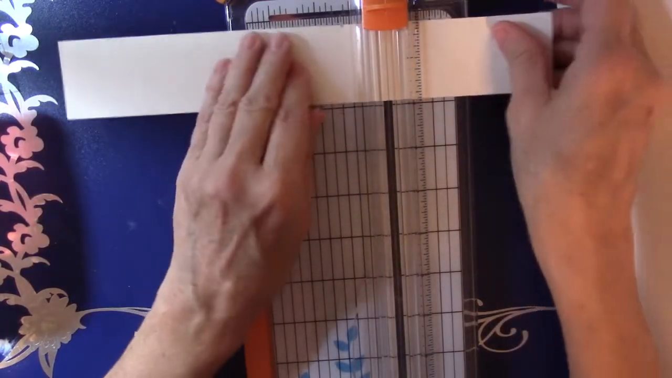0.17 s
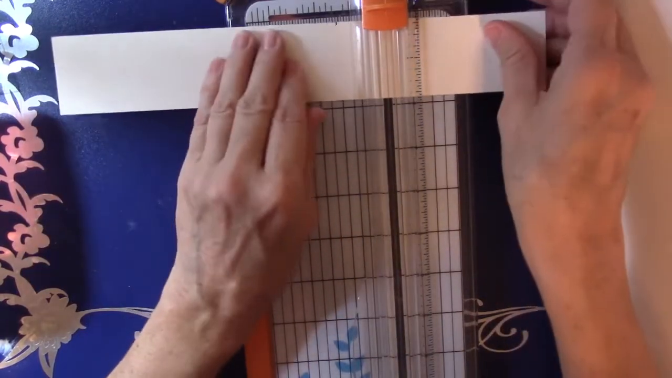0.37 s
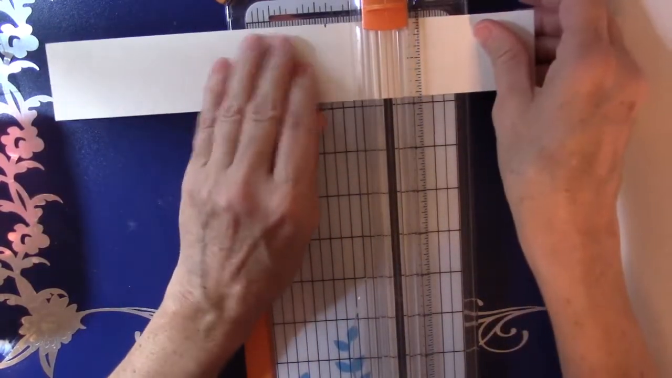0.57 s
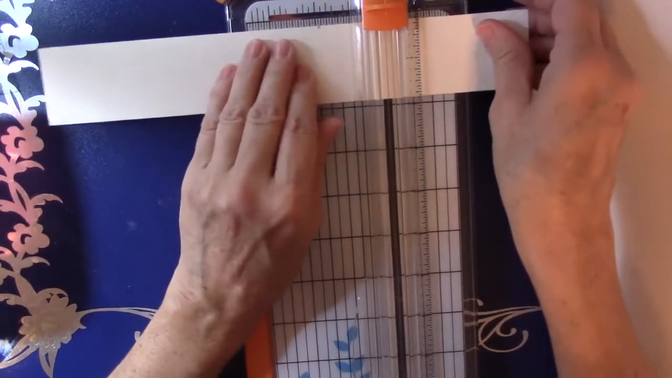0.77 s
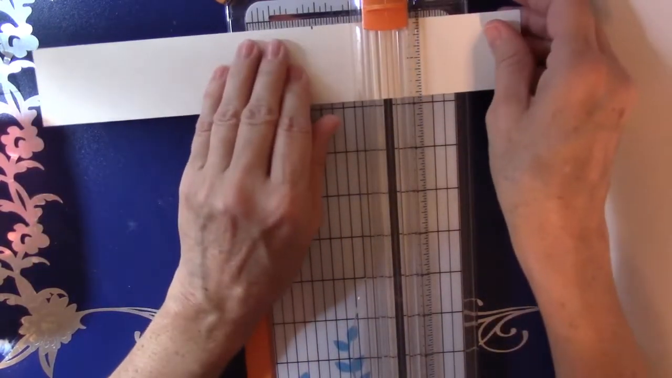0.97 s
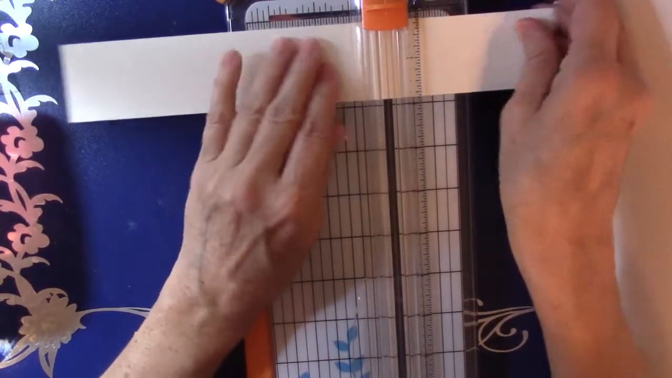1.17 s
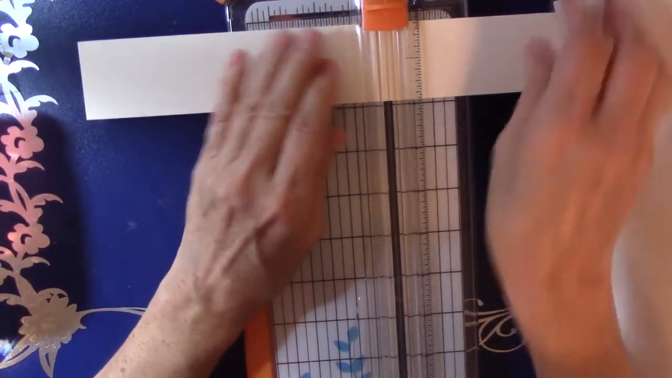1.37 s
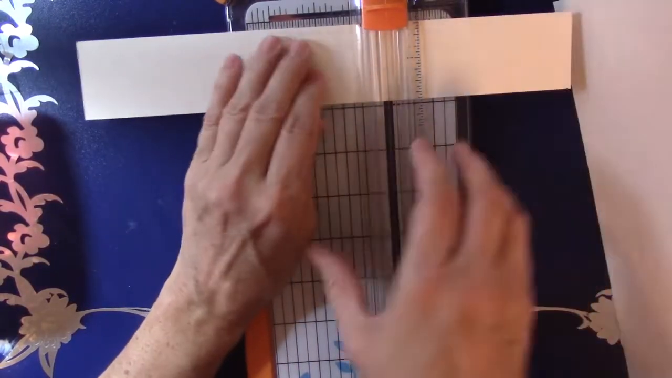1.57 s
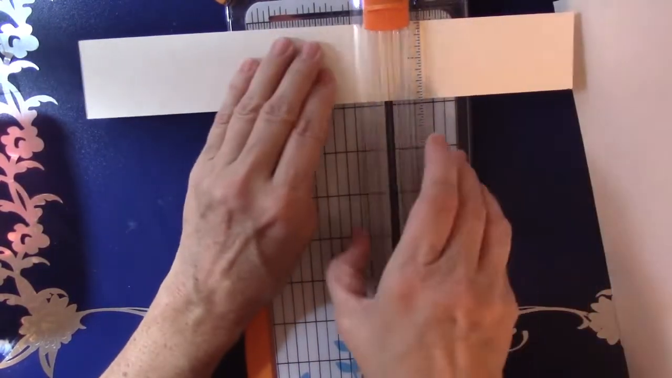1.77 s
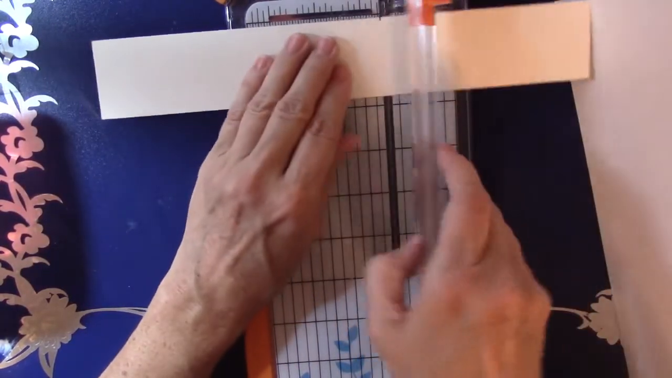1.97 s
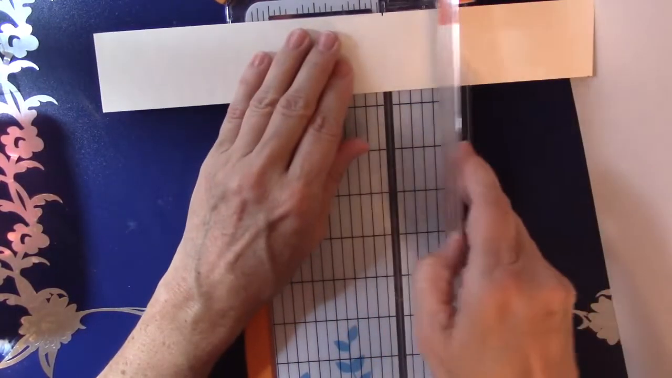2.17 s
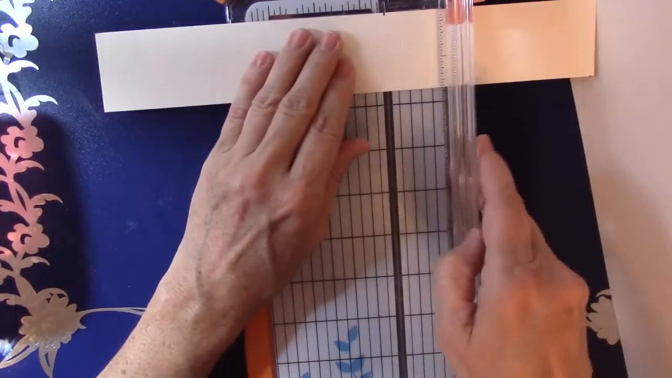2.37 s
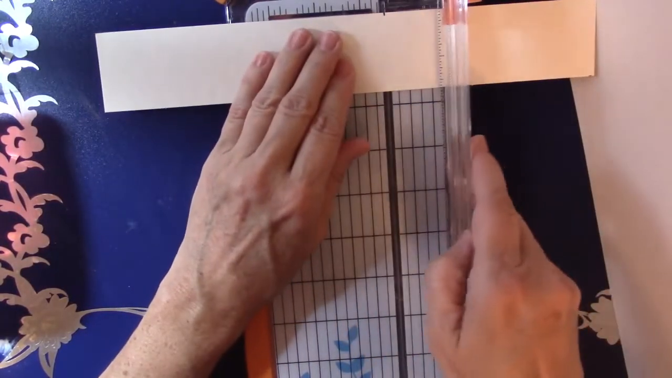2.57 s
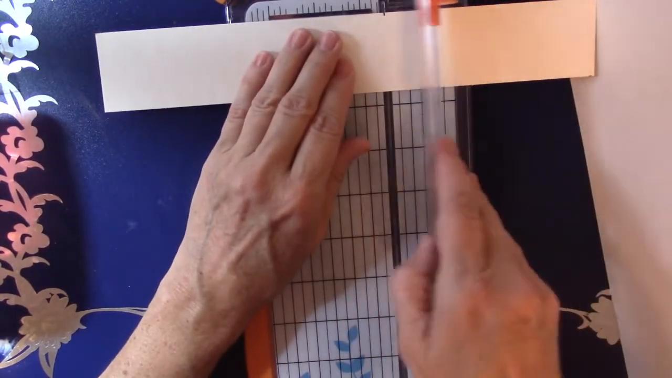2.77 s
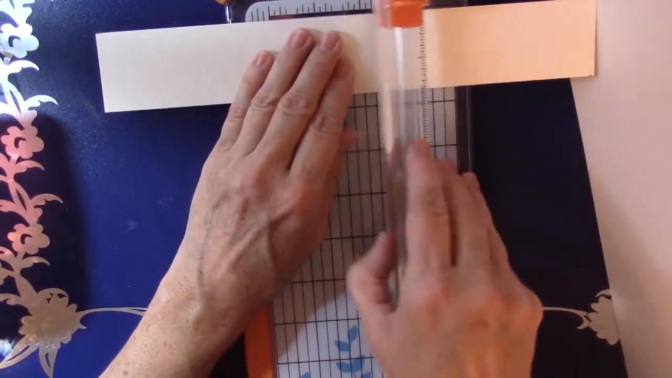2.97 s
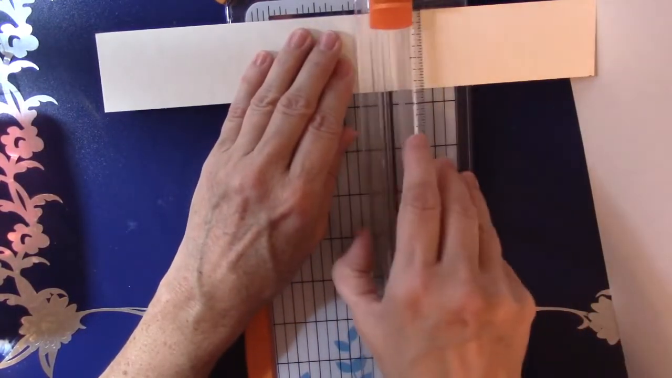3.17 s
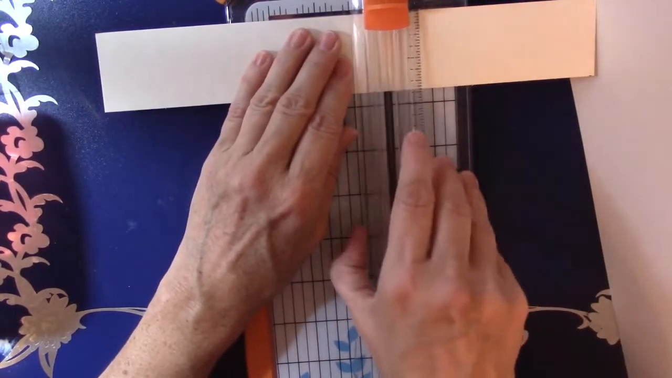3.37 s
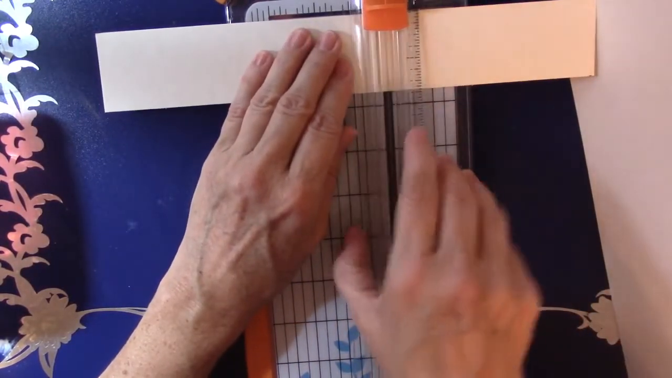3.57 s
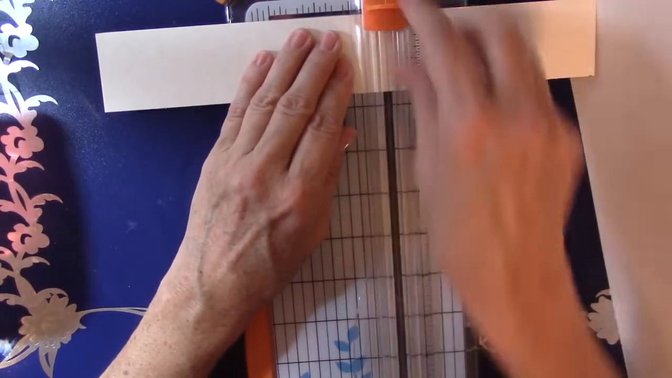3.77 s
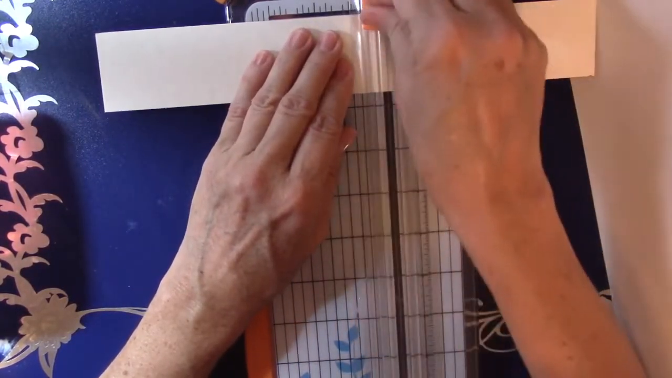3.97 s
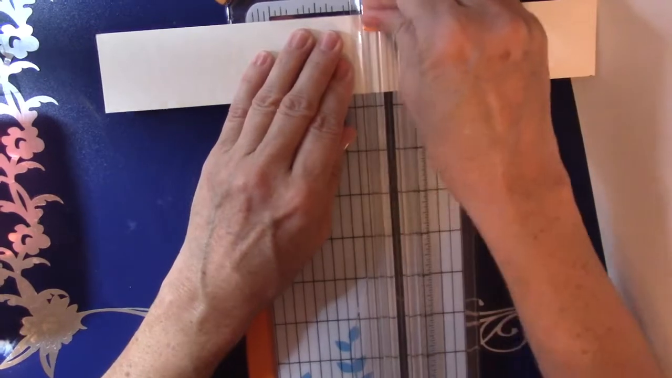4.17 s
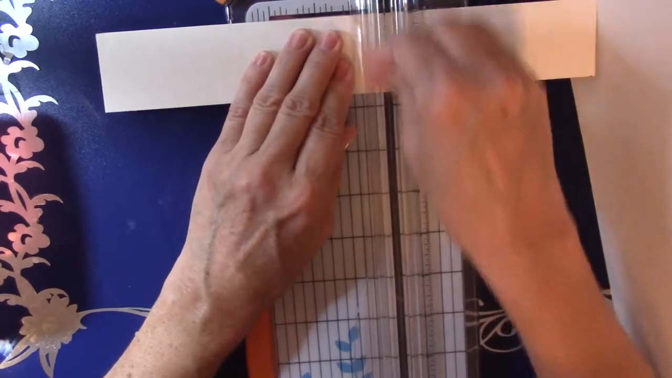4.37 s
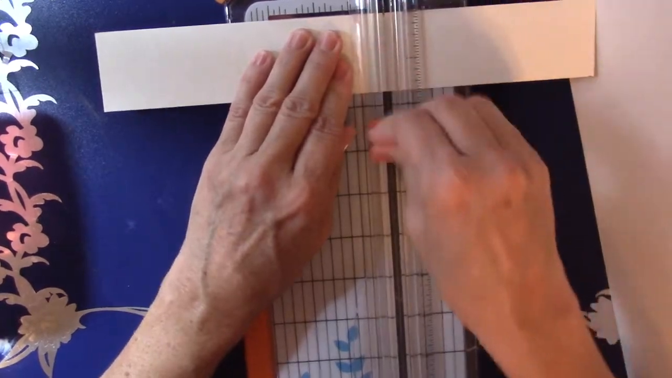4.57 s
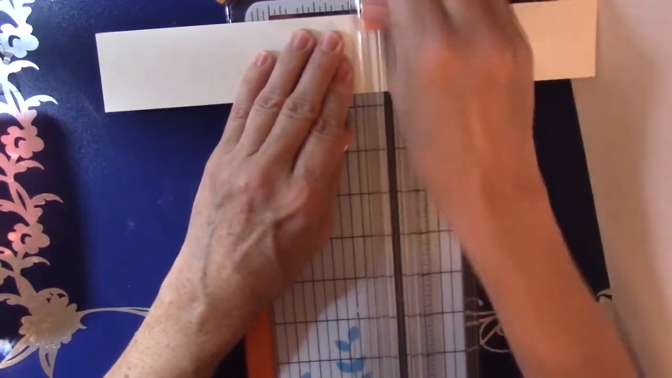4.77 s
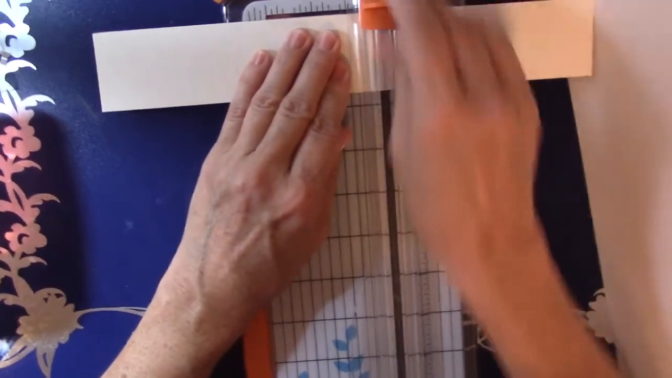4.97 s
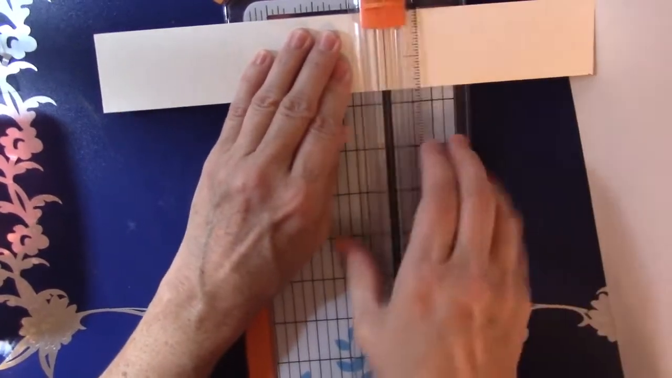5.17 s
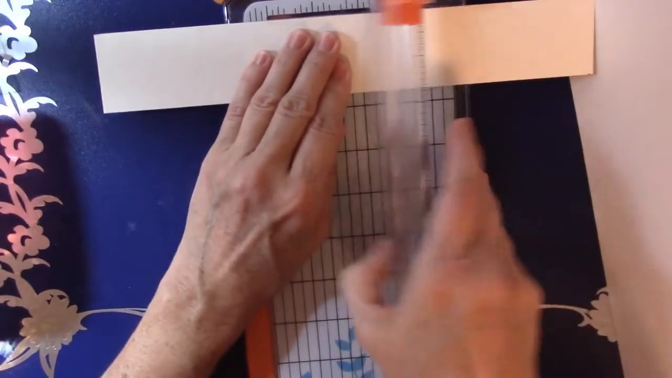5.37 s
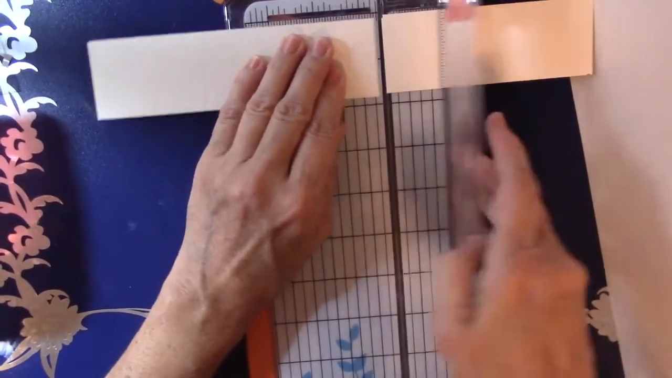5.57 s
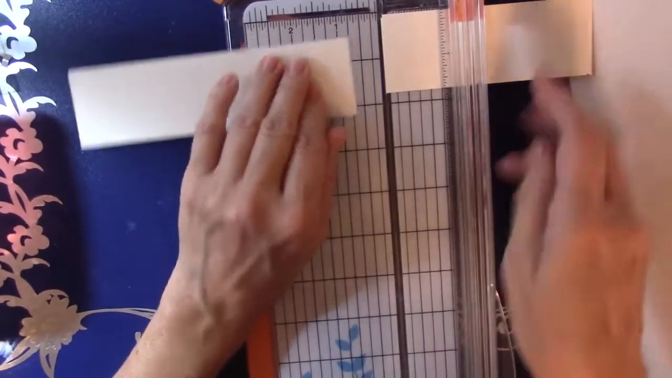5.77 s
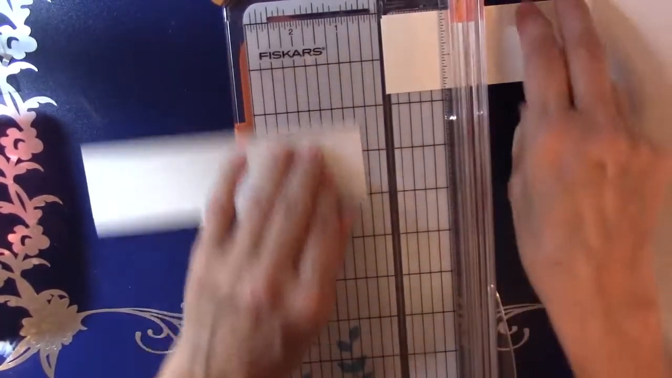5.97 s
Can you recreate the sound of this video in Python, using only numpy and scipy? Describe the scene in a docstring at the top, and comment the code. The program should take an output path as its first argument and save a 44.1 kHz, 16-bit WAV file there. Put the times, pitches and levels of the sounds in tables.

```python
"""Cutting card on a paper trimmer

A strip of card is slid into place on a plastic trimmer, on a table in a small quiet room. The clear
guide arm snaps shut with a rattle, the blade carriage rasps through the card, glides back and cracks
against its end stop; then the arm is lifted and the strip drawn away. Rubbing is made of many tiny
random slips, blows are short bursts of noise, and ringing or squeaking parts are sine waves."""
import sys
import numpy as np
from scipy import signal
from scipy.fft import rfft, irfft, next_fast_len
from scipy.io import wavfile
from scipy.ndimage import uniform_filter1d, map_coordinates

SR = 44100
rng = np.random.default_rng(int(sys.argv[2]) if len(sys.argv) > 2 else 0)


def generate_wav(sig):
    """Save sig (samples, or channels by samples) to the path in sys.argv[1] as 16-bit PCM at SR."""
    pcm = np.round(np.clip(np.atleast_2d(sig).T, -1, 1) * 32767).astype(np.int16)
    wavfile.write(sys.argv[1], SR, pcm)


N = 265570  # length of the scene in samples

# Levels in the event tables are relative: the sounds are mixed and scaled again later.
# Pushes of the card over the bed. Each row: start in seconds, length in seconds, time to rise 20 dB
# in seconds, time to fall 20 dB in seconds, rub in dB, rustle in dB, hiss in dB.
CARD_PUSHES = [(0.0, 0.024, .03, .04, -62, -52.5, -56), (0.09, 0.065, .12, .09, -72, -57, -52.5),
               (0.135, 0.04, .03, .26, -54.5, -62, -61), (0.43, .09, .09, .04, -60, -62, -59.5),
               (0.575, 0.025, .02, .05, -58.5, -59, -59.5), (0.738, 0.045, .05, .07, -59, -53, -56.5),
               (0.865, 0.035, .07, .03, -65, -58, -61), (1.06, .05, .07, .06, -62, -57, -51),
               (1.11, .09, .04, .16, -65, -58, -50), (1.235, 0.05, .09, .03, -68, -46, -58),
               (1.29, 0.034, .03, .015, -58, -46, -48.5), (1.505, .015, .02, .03, -72, -68, -64),
               (1.908, .015, .008, .14, -58, -56, -72), (5.391, 0.17, .03, .05, -55, -63, -60),
               (5.503, 0.024, .09, .015, -50, -52, -53.5), (5.59, 0.2, .06, .03, -74, -64.5, -60),
               (5.87, 0.14, .15, .05, -62, -55.5, -49)]
# Taps of fingers, arm and carriage on the bed. Each row: time in seconds, knock in dB, thud in dB,
# click in dB, upper edge of the contact's sound in Hz, note in Hz, the note's 60 dB fade in seconds.
BED_TAPS = [(0.129, -47, -70, -55, 12000, 724, .09), (1.075, -55, -68, -52, 9000, 1000, .025),
            (1.335, -56, -62, -65, 8000, 800, .05), (1.614, -57, -70, -60, 5000, 1100, .03),
            (1.62, -37, -49, -44, 7500, 900, .035), (1.6395, -40, -52, -39.5, 4800, 920, .06),
            (1.649, -48, -60, -46, 2600, 1460, .12), (1.815, -48, -48, -62, 3000, 603, .09),
            (2.01, -53, -62, -56, 5000, 764, .03), (3.381, -57, -63, -70, 3000, 810, .035),
            (3.892, -45.5, -70, -72, 4000, 774, .06), (3.903, -35.5, -51, -37, 9000, 1000, .06),
            (3.993, -62, -75, -49, 14000, 2100, .025), (4.118, -44.5, -58, -64, 1800, 598, .055),
            (4.416, -40, -46, -49, 9000, 630, .045), (4.424, -48, -38, -64, 3000, 450, .035),
            (4.516, -55, -49.5, -66, 4000, 880, .06), (4.553, -37, -46, -45, 6000, 950, .06),
            (4.878, -47, -50, -51, 3000, 1000, .06), (4.968, -53, -59.5, -60.5, 5000, 1030, .05),
            (5.133, -46, -43, -47, 8000, 1027, .07), (5.154, -47, -56, -64, 3000, 967, .1),
            (5.324, -44.5, -49, -66, 900, 560, .12), (5.544, -46.5, -50, -48, 8000, 839, .04),
            (5.553, -39, -48, -52, 6000, 785, .06), (5.559, -42, -43, -41, 7500, 880, .09),
            (5.613, -52, -54, -62, 2500, 535, .06), (5.778, -56, -62, -71, 3000, 960, .1),
            (5.898, -34, -39, -46, 5000, 1168, .06), (5.904, -36, -40, -56, 3000, 570, .08)]
# Catches of the card's edge. Each row: time in seconds, level in dB.
EDGE_TICKS = [(0.519, -61), (0.715, -65), (1.028, -65), (1.108, -60), (1.126, -54), (1.148, -59),
              (1.323, -55), (1.696, -63), (1.756, -61), (2.076, -66), (2.46, -72)]
# The thumb slips off the card. One row: start in seconds, length in seconds, level in dB,
# first pitch in Hz, last pitch in Hz.
THUMB_SLIP = (1.295, .04, -54, 3200, 1100)
# Creaks and squeaks of the plastic. Each row: start in seconds, length in seconds, level in dB,
# pitch in Hz, glide in Hz per second, overtones in dB, random changes per second.
PLASTIC_CREAKS = [(1.672, .004, -53, 7000, 0, -35, 1200), (1.83, .02, -54, 658, 1000, -25, 200),
                  (1.888, .015, -51, 745, 500, -25, 100), (2.14, .06, -67, 4080, 100, -30, 250),
                  (2.71, .095, -61, 1220, 0, -10, 55), (2.765, .08, -60, 296, 0, -22, 25),
                  (5.235, .025, -63, 7050, 0, -30, 1200), (5.331, .03, -47.5, 569.5, 2803, -25, 260),
                  (5.42, .05, -56, 1080, 2000, -20, 260), (5.489, .035, -53, 1205, -1200, -18, 260)]
# Turns of the guide arm in its hinge. Each row: start in seconds, length in seconds, level in dB.
HINGE_SCUFFS = [(1.83, .02, -59.5), (1.888, .012, -58), (2.14, .05, -60.5), (2.71, .085, -59.5),
                (2.775, .049, -63.5), (5.331, .0245, -60.5), (5.42, .05, -68), (5.489, .03, -62)]
# The guide arm chatters into its catch. Each row: time in seconds, ring in dB, crack in dB.
ARM_CHATTER = [(3.5522, -20, -26), (3.5579, -24, -26), (3.565, -25, -28.5), (3.5714, -16.5, -29),
               (3.5825, -25, -34), (3.5884, -28, -37), (3.6115, -32, -41), (3.6145, -25.5, -50),
               (3.6212, -34, -42), (3.6725, -42, -52)]
# Passes of the carriage along its rail. Each row: start in seconds, length in seconds,
# level at full speed in dB, how much weaker it starts in dB.
CARRIAGE_PASSES = [(4.203, .29, -49, 1.5), (4.566, 0.195, -42, 16.5), (4.82, .095, -52.5, 0)]
# Strength of the cut as the blade crosses the card. Each row: time in seconds,
# level of the rail's ring in dB, level of the treble in dB, both before the offsets below.
CUT_LEVELS = [(4.213, -40, -42), (4.313, -34, -35), (4.325, -40, -36), (4.373, -30, -35), (4.409, -37, -35),
              (4.416, -32, -36)]
# The carriage hits its end stop and rebounds. Each row: time in seconds, crack in dB, body in dB.
STOP_HITS = [(4.775, -21, -29), (4.7763, -20, -26.5), (4.7905, -34, -34), (4.7995, -50, -34)]

# Ringing notes of the guide arm. Each row: pitch in Hz, relative level in dB, 60 dB fade in seconds.
ARM_NOTES = [(339, -22, .13), (851, -5.5, .075), (909, -3, .08), (952, -5, .07), (1014, 1.5, .08),
             (1286, -14, .09), (1373, -11, .07), (1431, -1.5, .055), (1475, -.5, .055), (1570, -11, .08),
             (1845, -12, .07), (2005, -14, .1), (2565, -13, .06), (2635, -8, .065), (5913, -15, .05)]
# Resonances of the trimmer's bed. Each row: centre in Hz, width in Hz, level in dB.
BED_RESONANCES = [(145, 60, -3), (447, 44, -2), (640, 40, -9), (775, 110, -3), (1020, 57, -7),
                  (1410, 80, -5), (1570, 100, -4), (2020, 70, -7), (2990, 240, -8), (3570, 120, -9),
                  (4160, 80, -10), (5110, 270, -10), (6150, 210, -13), (6890, 250, -11), (7500, 230, -11)]
# Resonances of the rail that slide during the cut. Each row: first pitch in Hz, last pitch in Hz,
# first relative level in dB, last relative level in dB.
SLIDING_RAIL_NOTES = [(1590, 1260, 2, -5), (1480, 1680, -6, 2), (1740, 2090, -6, -3), (2000, 1800, -5, -8)]
# How long the room echoes at each pitch. Each row: frequency in Hz, 60 dB fade in seconds.
ROOM_FADE = [(100, .36), (300, 0.48), (1000, 0.22), (5000, 0.17), (12000, 0.1)]

# Tone colours. Each row, in all of the tables below: frequency in Hz, relative level in dB.
# Still air of the room
AIR_COLOUR = [(15, -43), (25, -33), (60, -24), (100, -15), (197, -10.5), (240, -12), (265, -11),
              (366, -12.5), (425, -14), (470, -14.5), (699, -18), (919, -15.5), (1040, -19.5),
              (1800, -21.5), (7500, -34), (9200, -42), (11500, -80), (20900, -120)]
# Card rubbing on the bed
RUB_COLOUR = [(100, -28), (300, -5), (600, 0.5), (1100, 3), (2200, -12.5), (4200, -11), (8000, -12),
              (14000, -38)]
# Card rustling as it flexes
RUSTLE_COLOUR = [(600, -25.5), (1500, -11), (2300, -3.5), (4200, -10.5), (6500, -12.5), (12000, -43)]
# Card hissing under the fingers
HISS_COLOUR = [(1500, -23.5), (4500, -5.5), (6000, -8), (6700, 2), (8200, -2.5), (10500, -4.5),
               (13000, -19), (16000, -17)]
# Ticks of the card's edge and crackle of its fibres
TICK_COLOUR = [(300, -30), (2000, -6), (4500, -4), (6800, 1), (10000, -4), (16000, -20)]
# Knock of the bed
KNOCK_COLOUR = [(40, -51), (120, -26), (300, -5), (480, -2.5), (850, 5), (1300, -5.5), (2000, -8.5),
                (3500, -23.5), (9000, -61)]
# Click of a tap
CLICK_COLOUR = [(60, -50.5), (500, -19), (1500, 7.5), (4000, 5.5), (5500, 2), (8000, -3), (12000, -11.5),
                (16000, -34)]
# Thud of the table
THUD_COLOUR = [(30, -42), (65, -37), (88, -3.5), (135, 3), (250, -6), (450, -7.5), (1200, -61)]
# Scuff of the arm's hinge
SCUFF_COLOUR = [(40, -46), (200, -9), (300, 3), (450, -8), (850, -4.5), (1200, 1), (1600, -9.5), (2250, -4),
                (3100, -11), (4100, -6.5), (5200, -11.5), (8500, -11.5), (14000, -41)]
# Dull clatter of the arm's catch
CATCH_COLOUR = [(30, -26), (70, -14), (130, -4), (400, -2), (700, -2), (1000, 5), (1200, -2), (1500, 3),
                (2000, -1), (2900, -7), (3940, -10), (7060, -19), (12700, -38), (16000, -70)]
# Dry crack of the arm's catch
CATCH_CRACK_COLOUR = [(60, -50), (500, -17), (1500, -5), (2200, -3), (2800, -5), (4000, 1.5), (5500, 0),
                      (7200, -2), (8500, -12), (12500, -22), (16000, -48)]
# Carriage swishing along the rail
RAIL_COLOUR = [(59, -37.5), (100, 1), (153, 6), (215, -35.5), (271, -7), (373, -3), (452, 3), (836, -2),
               (1870, 0.5), (2750, -5), (6420, -1.5), (11900, -11), (16000, -30.5)]
# Tearing that shakes the bed
TEAR_COLOUR = [(40, -36), (80, -12), (140, -2), (220, 0), (310, 4), (450, -1), (700, 1), (790, -1),
               (870, -7), (1020, -1), (1180, -5), (1500, -6), (2300, -5), (3000, -16), (8000, -50)]
# Treble of the parting fibres
FIBRE_COLOUR = [(1000, -35), (2300, -4), (3000, -6), (3600, -4.5), (4400, -6), (5200, -2.5), (6000, -7.5),
                (7500, -5.5), (8500, -9.5), (10500, -11), (13000, -18), (16000, -30)]
# Hard crack of the end stop
STOP_CRACK_COLOUR = [(40, -41), (300, -16.5), (1000, -3), (1600, 1), (2750, -5), (4100, 3), (5600, 0),
                     (6300, -5), (8200, -5), (9400, -14.5), (12500, -16), (16000, -47)]
# Solid knock of the frame at the end stop
STOP_BODY_COLOUR = [(30, -55), (65, -30), (90, 0), (130, -6), (220, -12), (420, 2), (620, 0), (760, 2),
                    (1050, 2), (1450, -1), (2100, -5), (2750, -13), (8000, -30), (14000, -45)]
# Rail sizzling out after the end stop
SIZZLE_COLOUR = [(300, -25), (1500, -3), (2800, -7), (4000, -1), (5300, 0), (8200, -7), (12000, -16),
                 (16000, -42)]

TOP_HZ = 15900  # upper limit of the finished sound
SMOOTH_DB = 1.5  # basic depth of colour changes in sliding; some rubs multiply it
# Rise and fall times are the seconds taken for 20 dB.
SCUFF_RISE_S, SCUFF_FALL_S = 0.22, 0.19
CREAK_RISE_S, CREAK_FALL_S = .018, .04
PASS_RISE_S, PASS_FALL_S = .03, 0.022
CUT_RISE_S, CUT_FALL_S = .004, 0.014
SPEED_UP_S = 0.066  # time constant of the carriage gathering speed
RING_RISE_S = .0012  # time constant of a contact setting the arm ringing
CUT_START_S, CUT_LENGTH_S = 4.211, 0.204
CUT_DB, CUT_SHORTFALL_DB = -33, 8  # shaking bed at full speed; how much weaker it starts
RAIL_RING_DB, FIBRES_DB = -1.5, -.5  # offsets added to the two levels in CUT_LEVELS


def amp(db):
    """Turn decibels into gain."""
    return 10 ** (np.asarray(db) / 20)


def unit(x):
    """Scale to an average strength (rms) of 1."""
    return x / np.sqrt(np.mean(x ** 2) + 1e-20)


def along(points, hz):
    """Read a curve of (Hz, value) points, with frequency on a log axis."""
    f, v = np.transpose(points)
    return np.interp(np.log(hz + 1), np.log(f + 1), v)


def since(start):
    """Seconds since a moment, for every sample."""
    return np.arange(N) / SR - start


def stroke(start, length, rise, fall):
    """Gain of one movement: it rises to full at the start, holds for its length and dies away."""
    t = since(start)
    before = np.maximum(-t, 0) / rise
    after = np.maximum(t - length, 0) / fall
    return amp(-np.minimum(20 * (before + after), 160))


def wobble(rate):
    """A smooth curve through random points, rate of them a second."""
    points = rng.standard_normal(int(N * rate / SR) + 4)
    return map_coordinates(points, [np.arange(N) * rate / SR])


def filtered(x, response):
    """Multiply the spectrum of x by a response, given as a function of frequency."""
    n = x.shape[-1]
    m = 2 * next_fast_len(n // 2 + 4096)  # spare room for the filter's tail
    return irfft(rfft(x, m) * response(np.fft.rfftfreq(m, 1 / SR)), m)[..., :n]


def coloured(x, spectrum):
    """Give x a (Hz, dB) colour with a filter that acts only after each sound starts."""
    def response(hz):
        # folding the cepstrum forward in time gives the filter minimum phase
        cepstrum = irfft(np.log(amp(along(spectrum, hz))))
        half = len(cepstrum) // 2
        return np.exp(rfft(np.r_[cepstrum[0], 2 * cepstrum[1:half], np.zeros(half)]))
    return filtered(x, response)


def through_bed(x, direct):
    """The bed's resonances boost some pitches, on top of a share of direct sound."""
    def response(f):
        return direct + sum(amp(db) * 1j * f * width / (centre * centre - f * f + 1j * f * width)
                            for centre, width, db in BED_RESONANCES)
    return filtered(x, response)


def grains(rate, spread_db):
    """Tiny slips at random moments, rate a second on average, of uneven size; rms 1."""
    happens = rng.random(N) < rate / SR
    direction = rng.choice([-1, 1], N)
    return unit(happens * direction * amp(spread_db * rng.standard_normal(N)))


def friction(spectrum, rate, spread_db, patchy_db):
    """Dense slips whose colour shifts as the contact moves; rms 1."""
    z = signal.stft(grains(rate, spread_db), nperseg=1024)[2]
    # smoothing random levels over pitch and time makes the shifting patches
    patches = uniform_filter1d(rng.standard_normal(z.shape), size=3, axis=0)
    patches = uniform_filter1d(patches, size=6, axis=1)
    slips = signal.istft(z * amp(patchy_db * unit(patches)), nperseg=1024)[1][:N]
    return unit(coloured(slips, spectrum))


def hoarse(hz, rate):
    """A resonance kept going by uneven slips: it follows a pitch curve with random blur; rms 1."""
    phase = 2 * np.pi * np.cumsum(hz) / SR
    return unit(wobble(rate) * np.sin(phase) + wobble(rate) * np.cos(phase))


def speed_up(start, shortfall_db):
    """Gain of the carriage's friction as the hand brings it up to speed."""
    return amp(-shortfall_db * np.exp(-np.clip(since(start), 0, 1) / SPEED_UP_S))


def blow_time():
    """Seconds from the start of one blow, for each of its samples."""
    return np.arange(SR // 3) / SR


def burst(t60, pulse=0):
    """Crowded, fading vibrations of a contact; pulse adds the strength of the blow itself."""
    t = blow_time()
    shiver = rng.standard_normal(len(t)) * amp(-60 * t / t60)
    return shiver / np.linalg.norm(shiver) + pulse * (t == 0)


def add(track, s, db, sound):
    """Place a blow in a track; db is its energy spread over 20 ms."""
    start = round(s * SR)
    sound = amp(db) * sound / np.linalg.norm(sound) * np.sqrt(.02 * SR)
    track[start:start + len(sound)] += sound[:N - start]


def room_tone():
    """Still air is coloured noise from all sides; a faint appliance hum is a wavering sine wave."""
    mid, side = unit(coloured(rng.standard_normal((2, N)), AIR_COLOUR))
    air = mid + amp(-6.5) * np.array([side, -side])
    hum = np.sin(2 * np.pi * 242 * since(0) + 0.49 * wobble(2.9)) * amp(1.8 * wobble(7))
    return amp(-60.0) * air + amp(-65.0) * hum


def card():
    """Card rubs on the bed, rustles as it flexes and hisses under the fingers, its fibres crackling."""
    power = sum(np.outer(amp(db), stroke(s, length, rise, fall)) ** 2
                for s, length, rise, fall, *db in CARD_PUSHES)
    rub, rustle, hiss = np.sqrt(power)
    low = amp(-1) * rub * friction(RUB_COLOUR, rate=3000, spread_db=2, patchy_db=SMOOTH_DB)
    middle = amp(-2.0) * rustle * friction(
        RUSTLE_COLOUR, rate=2400, spread_db=3.5, patchy_db=1.6 * SMOOTH_DB)
    high = amp(-1.5) * hiss * friction(
        HISS_COLOUR, rate=12000, spread_db=4, patchy_db=1.3 * SMOOTH_DB)
    crackle = amp(-9) * hiss * unit(coloured(grains(rate=260, spread_db=3), TICK_COLOUR))
    return (low + middle + high + crackle) * amp(1.15 * wobble(45))


def taps():
    """A tap is a brief click, a knock of the bed with a fading note, and a slower thud of the table."""
    out, t = np.zeros(N), blow_time()
    for s, knock_db, thud_db, click_db, edge_hz, hz, t60 in BED_TAPS:
        # the place struck sets the note
        note = np.sin(2 * np.pi * hz * t) * amp(-60 * t / t60)
        dull = signal.butter(2, min(edge_hz, TOP_HZ), fs=SR, output="sos")
        contact = signal.sosfilt(dull, burst(t60, pulse=.5))
        knock = coloured(through_bed(contact, direct=0.99), KNOCK_COLOUR)
        # a fleshy contact, with much knock beside its click, builds up gradually
        softness = np.clip((knock_db - click_db) / 10, .05, 1.5)
        onset = 1 - np.exp(-t / (.001 * softness))
        click = signal.sosfilt(dull, burst(.5 * t60, pulse=.3))
        add(out, s, click_db - 3 - 3 * softness, coloured(click, CLICK_COLOUR))
        add(out, s, knock_db, (unit(knock) + .45 * unit(note)) * onset)
        add(out, s, thud_db, coloured(burst(2 * t60, pulse=.4), THUD_COLOUR))
    return out


def card_edge():
    """The card's edge catches in dry ticks; the thumb slips off it with a falling swish."""
    out = np.zeros(N)
    for s, db in EDGE_TICKS:
        add(out, s, db, coloured(burst(t60=.012, pulse=.5), TICK_COLOUR))
    s, length, db, from_hz, to_hz = THUMB_SLIP
    hz = from_hz * (to_hz / from_hz) ** np.clip(since(s) / length, 0, 1)
    return out + amp(db) * stroke(s, length, .04, .015) * hoarse(hz, rate=1400)


def creak():
    """Plastic sticks and slips: evenly in a thin squeak with overtones, unevenly in a hoarse creak."""
    out = np.zeros(N)
    for s, length, db, hz, glide_hz, overtone_db, blur in PLASTIC_CREAKS:
        pitch = hz + glide_hz * np.clip(since(s), 0, 2 * length)
        phase = 2 * np.pi * np.cumsum(pitch) / SR + .9 * wobble(blur)
        overtones = np.sin(2 * phase) + .7 * np.sin(3 * phase)
        tone = np.sin(phase) + amp(overtone_db) * overtones
        level = amp(db) * stroke(s, length, CREAK_RISE_S, CREAK_FALL_S)
        out += level * unit(tone * amp(3 * wobble(blur)))
    return out


def arm_rub():
    """The arm scuffs softly in its hinge, as dense slips under slow swells."""
    level = np.max([amp(db) * stroke(s, length, SCUFF_RISE_S, SCUFF_FALL_S)
                    for s, length, db in HINGE_SCUFFS], axis=0)
    return level * friction(SCUFF_COLOUR, rate=4000, spread_db=5, patchy_db=2 * SMOOTH_DB)


def arm_ring():
    """Every contact tops up the arm's own notes, which ring on through the chatter."""
    times, ring_db, _ = np.transpose(ARM_CHATTER)
    t = np.arange(SR // 2) / SR
    # one line of ages for each contact, zero until it happens
    age = np.maximum(t - (times - times[0])[:, None], 0)
    onset = 1 - np.exp(-age / RING_RISE_S)
    ring = 0
    for hz, db, t60 in ARM_NOTES:
        push_db = db + (ring_db + rng.normal(0, 2, len(times)))[:, None]
        pushes = amp(push_db - 60 * age / t60) * onset
        phase = 2 * np.pi * (hz * t + rng.random()) + .5 * wobble(120)[:len(t)]
        ring += np.linalg.norm(pushes, axis=0) * np.sin(phase)
    ring *= np.sqrt(2) / np.linalg.norm([amp(db) for _, db, _ in ARM_NOTES])
    return np.pad(ring, (round(times[0] * SR), N))[:N]


def arm_catch():
    """Contacts crack dryly with a dull clatter under the arm's ring; the first thumps the table."""
    out, t = np.zeros(N), blow_time()
    for s, ring_db, crack_db in ARM_CHATTER:
        add(out, s, ring_db - 10.5, coloured(burst(t60=.07), CATCH_COLOUR))
        add(out, s, crack_db, coloured(burst(t60=.015, pulse=.3), CATCH_CRACK_COLOUR))
    thump = coloured(burst(t60=0.3), THUD_COLOUR) * (1 - np.exp(-t / .005))
    add(out, ARM_CHATTER[0][0], -46, thump)
    return out + arm_ring()


def glide():
    """The carriage swishes along its smooth rail, as very dense slips that grow with its speed."""
    level = sum(amp(db) * stroke(s, length, PASS_RISE_S, PASS_FALL_S) * speed_up(s, shortfall_db)
                for s, length, db, shortfall_db in CARRIAGE_PASSES)
    return level * friction(RAIL_COLOUR, rate=12000, spread_db=4.0, patchy_db=SMOOTH_DB)


def blade():
    """Fibres part in an uneven rasp that shakes the bed; rail notes slide as the carriage travels."""
    s, *levels = np.transpose(CUT_LEVELS)
    rail_db, treble_db = (np.interp(since(0), s, level) for level in levels)
    tear = friction(TEAR_COLOUR, rate=1400, spread_db=2.5, patchy_db=SMOOTH_DB)
    shake = unit(through_bed(tear, direct=.4))
    fibres = friction(FIBRE_COLOUR, rate=4500, spread_db=2, patchy_db=1.8 * SMOOTH_DB)
    fibres = unit(through_bed(fibres, direct=.35) * amp(1.7 * wobble(220)))
    travel = np.clip(since(CUT_START_S) / CUT_LENGTH_S, 0, 1)  # 0 to 1 through the cut
    rail = sum(amp(db0 + (db1 - db0) * travel) * hoarse(hz0 + (hz1 - hz0) * travel, rate=190)
               for hz0, hz1, db0, db1 in SLIDING_RAIL_NOTES)
    rasp = amp(CUT_DB) * speed_up(CUT_START_S, CUT_SHORTFALL_DB) * shake
    rasp += amp(rail_db + RAIL_RING_DB) * unit(rail)
    rasp += amp(treble_db + FIBRES_DB) * fibres
    return stroke(CUT_START_S, CUT_LENGTH_S, CUT_RISE_S, CUT_FALL_S) * rasp


def end_stop():
    """The carriage cracks hard and the frame knocks; the rail sizzles out and the table thuds."""
    out, t = np.zeros(N), blow_time()
    for s, crack_db, body_db in STOP_HITS:
        add(out, s, crack_db, coloured(burst(t60=.009, pulse=.5), STOP_CRACK_COLOUR))
        add(out, s, body_db, coloured(burst(t60=.09, pulse=.6), STOP_BODY_COLOUR))
    first_hit = STOP_HITS[0][0]
    add(out, first_hit, -32, coloured(burst(t60=0.11), SIZZLE_COLOUR))
    thud = coloured(burst(t60=0.12), THUD_COLOUR) * (1 - np.exp(-t / .005))
    add(out, first_hit, -40, thud)
    return out


def room(x):
    """Walls answer almost alike at two close microphone ports, most of all in the bass."""
    hz, t, z = signal.stft(rng.standard_normal((2, SR // 2)), SR, nperseg=256)
    fade = amp(-60 * t / along(ROOM_FADE, hz)[:, None])
    tail = signal.istft(z * fade, SR, nperseg=256)[1]
    tail = tail / np.linalg.norm(tail[0])
    delayed = np.pad(x, (SR // 200, 0))[None]  # 5 ms before the walls answer
    mid, side = signal.fftconvolve(delayed, tail, axes=1)[:, :N]
    side = filtered(side, lambda f: amp(along([(150, -15), (800, -16), (4000, -5)], f)))
    return amp(-1.5) * (mid + np.array([side, -side]))


def scene():
    """The trimmer lies close below the microphone, its end stop nearest of all."""
    trimmer = card() + card_edge() + arm_rub() + creak() + blade() + glide() + arm_catch() + taps()
    stop = end_stop()
    # the direct sound is very slightly louder in the first channel than in the second
    direct = (trimmer + stop) * amp([[.1], [-.1]])
    # the nearer end stop stirs the room less, beside its direct sound
    echo = amp(-11.8) * room(trimmer + amp(-3) * stop)
    return direct + echo + room_tone()


def record(dry):
    """The recorder thins deep bass, rounds off the highest peaks and cuts steeply above its limit."""
    thin = signal.sosfilt(signal.butter(1, 55, "high", fs=SR, output="sos"), dry)
    rounded = thin / (1 + (thin / .9) ** 6) ** (1 / 6)
    return filtered(rounded, lambda hz: 1 / (1 + (hz / TOP_HZ) ** 120))


dry = scene()
out = record(dry)
generate_wav(out)
```